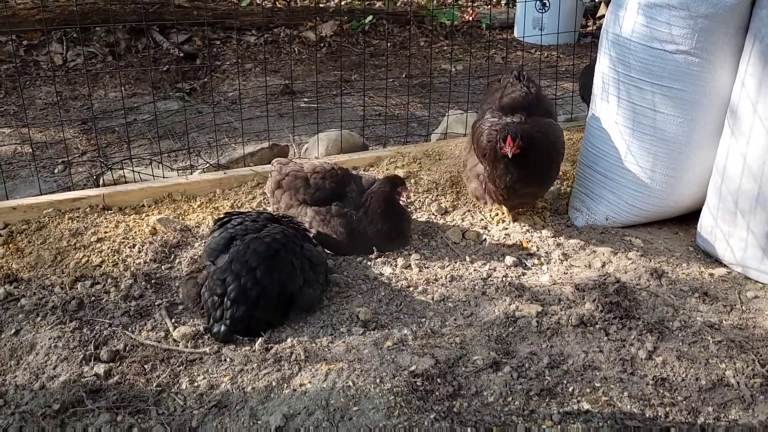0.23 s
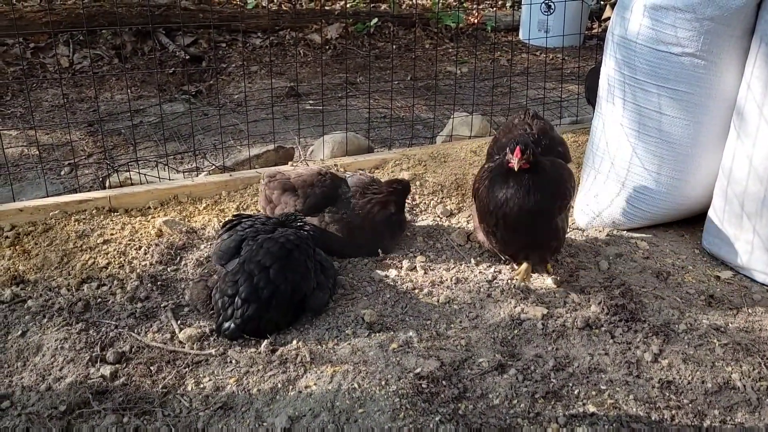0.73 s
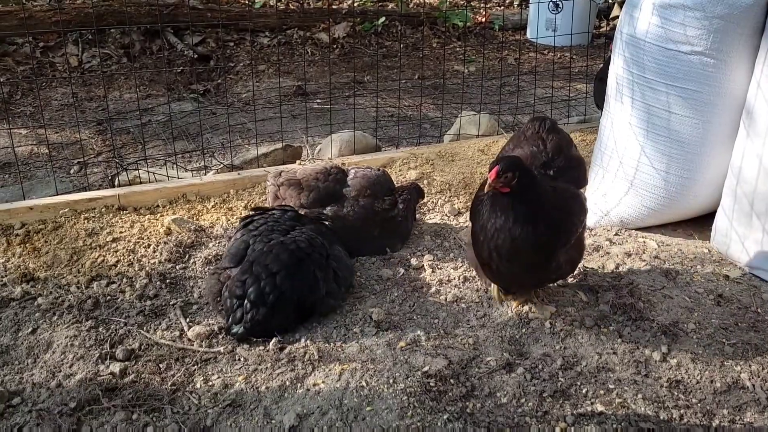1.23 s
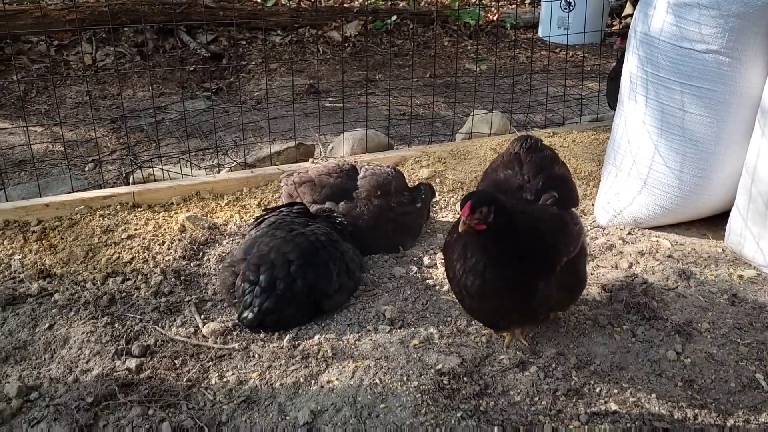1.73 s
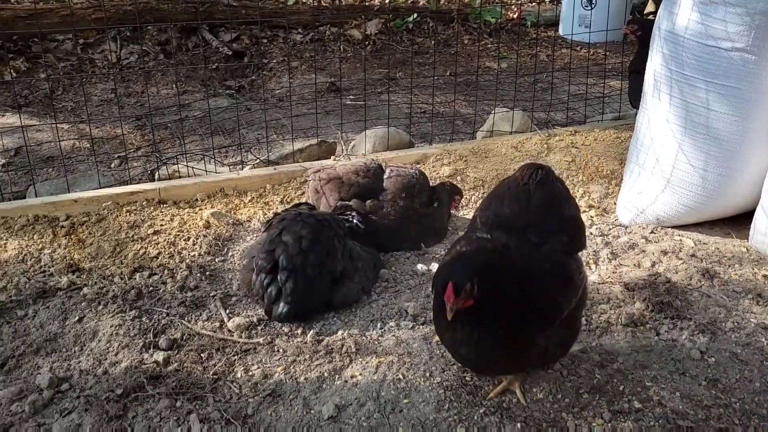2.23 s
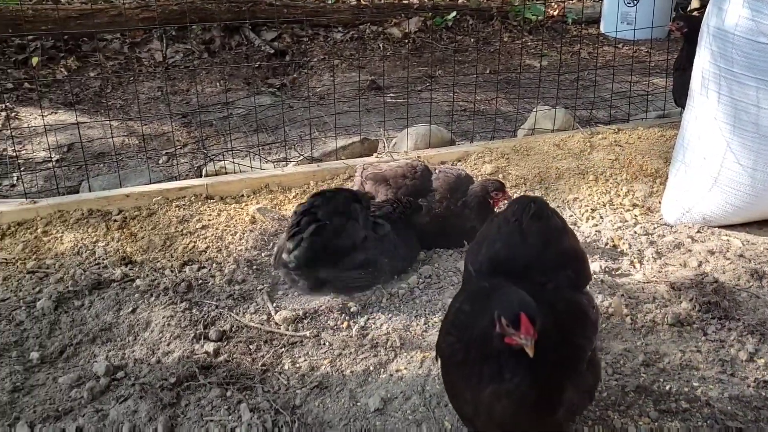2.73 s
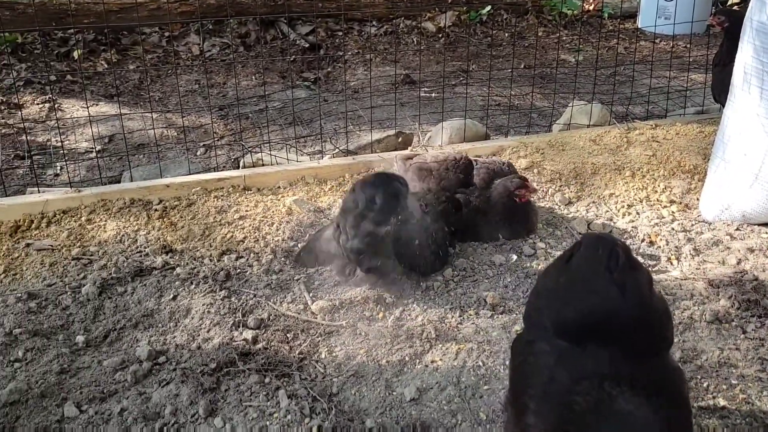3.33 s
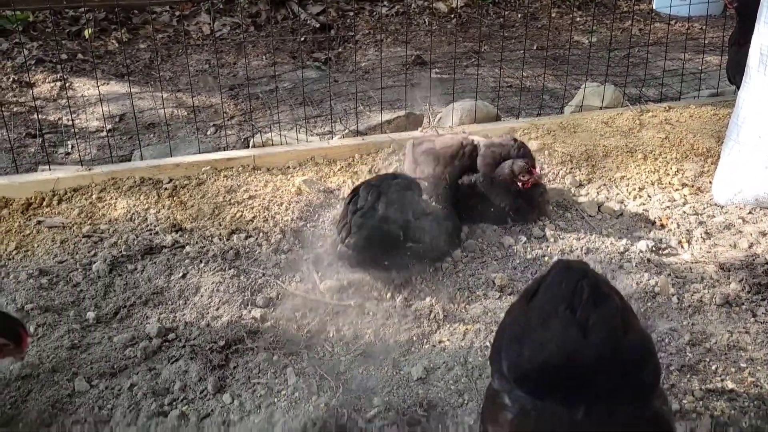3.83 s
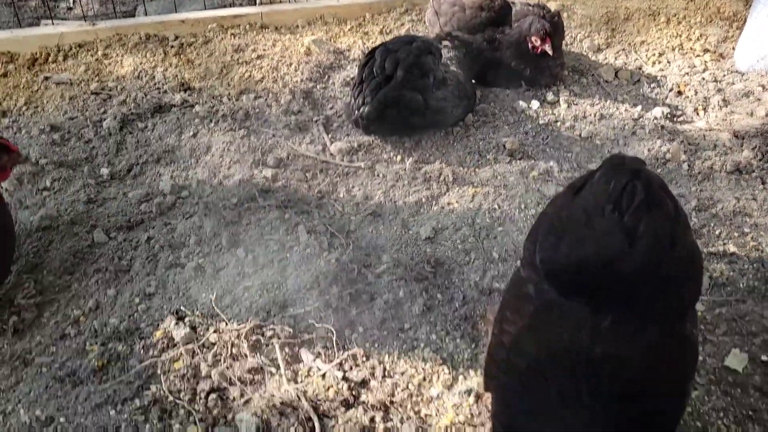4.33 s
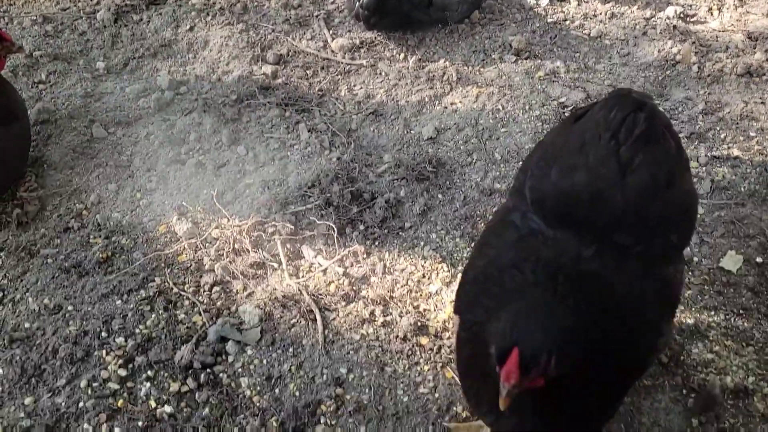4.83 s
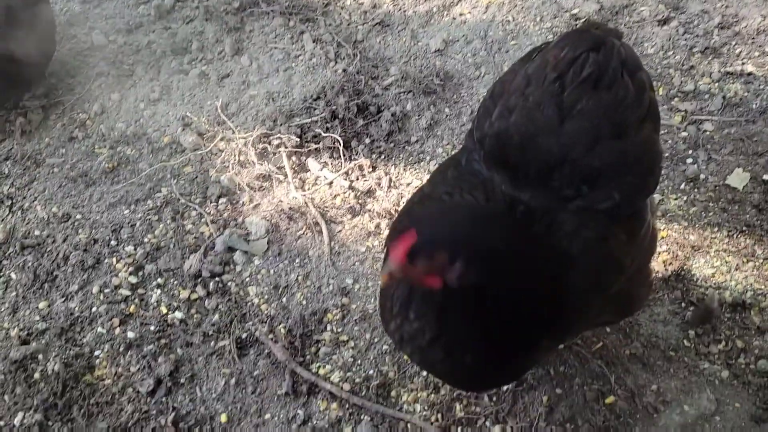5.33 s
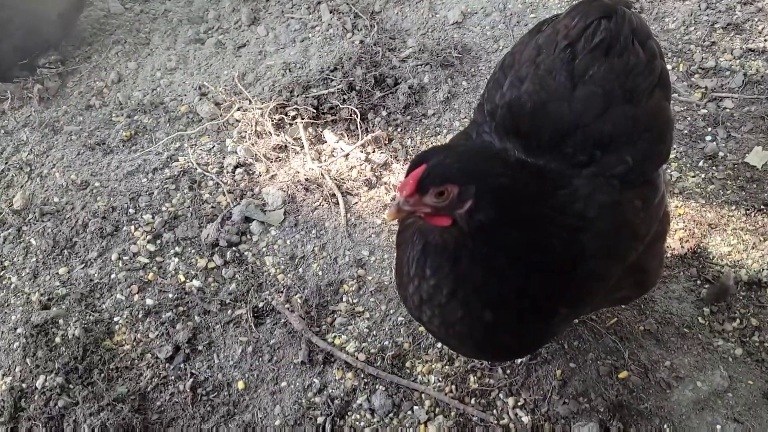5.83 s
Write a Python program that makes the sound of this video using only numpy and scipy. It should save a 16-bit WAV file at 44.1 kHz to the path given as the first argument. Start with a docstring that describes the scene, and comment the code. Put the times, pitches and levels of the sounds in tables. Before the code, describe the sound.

Hens give short, scattered clucks in a dirt run while one shakes gritty dust through its feathers, over faint crickets and soft hiss.

```python
"""A dirt run with hens: one clucks to the right, then one close by; another shakes dust through its feathers.
Each cluck is a train of syrinx pulses filtered by windpipe and beak, above a sinusoidal chest tone.
Ticks of beaks, feet and wings, wing thumps, grit and shuffling are noise shaped in time and in frequency.
Crickets chirp and insects sing in two bands, as noise in narrow resonances, over a low rumble and far hiss.
"""
import sys
import numpy as np
from scipy import signal
from scipy.fft import rfft, irfft, next_fast_len
from scipy.io import wavfile
from scipy.ndimage import uniform_filter1d

SR = 44100
rng = np.random.default_rng(int(sys.argv[2]) if len(sys.argv) > 2 else 0)


def dump(signal):
    """Clip the signal to [-1, 1] and save it as 16-bit WAV at the path in sys.argv[1]."""
    limited = np.clip(np.atleast_2d(signal).T, -1, 1)
    pcm = np.round(limited * 32767).astype(np.int16)
    wavfile.write(sys.argv[1], SR, pcm)


N = 268128   # length in samples

# Notes of the hens. Each row: start, attack, hold and fall in seconds, first held, last held and end pitch in Hz,
# chest, windpipe and beak level in dB, onset relative to these in dB, swell over the hold in dB, voice, hen.
CLUCKS = [ (0.14, 0.0079, 0.0033, 0.023, 464, 389, 346, -52.5, -55, -74, 3, 4.5, "clear", "far, murmur"),
          (0.196, 0.008, 0.019, .044, 572, 519.2, 291.4, -44, -50, -41, -9, 3, "rough", "far, turned"),
          (0.425, .013, 0.058, 0.027, 633.7, 593, 285.4, -45.5, -50.5, -43, -8.5, 1, "rough", "far, turned"),
          (1.248, 0.0075, 0.0088, 0.013, 375, 352, 378, -48.5, -54, -67.5, -11, 1, "clear", "far, murmur"),
          (1.400, 0.0046, .020, 0.017, 408, 501, 400, -56.5, -59.5, -67, 3, 3.5, "rough", "far, murmur"),
          (1.698, 0.013, 0.03, 0.038, 560.3, 543.4, 296, -42, -40.5, -39.5, -14, 2.5, "hoarse", "far"),
          (1.947, 0.012, 0.021, 0.038, 550.2, 531, 325, -40, -37.5, -36.5, -12.5, -1, "hoarse", "far"),
          (2.193, .005, .056, .034, 594, 562.7, 270.7, -45, -41, -41, -3, 4, "hoarse", "far"),
          (2.478, 0.0094, .046, 0.031, 637.6, 640, 254, -40, -35, -42, -1.5, 1, "hoarse", "far"),
          (5.254, 0.0047, 0.013, 0.016, 378.7, 338, 296, -53, -61, -54.5, -2, -3.5, "husky", "low"),
          (5.271, .009, .018, 0.0067, 304.4, 286, 281, -37, -52, -54.5, -13, -3, "husky", "low"),
          (5.555, 0.0072, 0.0017, 0.01, 436, 396.6, 308, -38.5, -35, -39, -14.5, -1, "husky", "near"),
          (5.718, 0.018, .004, 0.044, 451, 472, 290, -45, -56, -57.5, -6.5, -1, "rough", "near"),
          (5.783, 0.009, .020, .040, 541.7, 495.6, 283, -31.5, -33.5, -31, -8.5, -2, "husky", "near"),
          (5.877, 0.0093, 0.0016, .025, 405.3, 370, 261, -42.5, -45.5, -50, -10, -1.5, "husky", "near"),
          (6.053, 0.0025, 0.0014, 0.0082, 667, 626, 584, -31, -40, -36.5, -7, -10, "clear", "near"),
          (6.059, .014, 0.025, 0.027, 563, 526, 298, -31.5, -32, -25.5, -7, 5.5, "clear", "near"), ]
# Irregularity of the syrinx pulses for each voice, 0 to 1.
ROUGHNESS = {"clear": .1, "husky": .25, "rough": .4, "hoarse": .56}
# Resonances of each throat. First row: windpipe centre as a multiple of the first held pitch, width in Hz.
# Each later row, the beak: centre in Hz, width in Hz, relative level in dB.
FAR_THROAT = [(1.66, 1450), (1583, 375, 0.84), (1674, 246, 0), (2240, 83, -19), (2590, 400, -13.5),
              (3390, 700, -23), (4806, 556, -20), (9300, 560, -44), (11900, 640, -40)]
TURNED_THROAT = [(1.31, 570), (1504, 160, 0.41), (1750, 250, 0), (2200, 240, -14), (2990, 340, -10.5),
                 (3650, 240, -18.5), (4700, 1340, -19.5), (9700, 810, -40), (12000, 740, -38)]   # the far hen with her head turned
MURMUR_THROAT = [(1.82, 280), (1555, 150, 0), (1690, 320, 0)]   # the far hen with her beak almost shut
LOW_THROAT = [(1.65, 150), (1390, 160, -7), (2240, 320, 0), (2800, 440, -3.8), (4070, 620, -7)]
NEAR_THROAT = [(1.24, 480), (1540, 385, 0), (1752, 363, -0.5), (2400, 160, -25), (2946, 530, -10.5),
               (3190, 1300, -21), (4630, 1380, -23.5), (8900, 3800, -44), (13100, 500, -44)]
# Paths from each hen to the two microphone ports.
# Each row: frequency in Hz, left minus right in dB, phase lag of left in radians.
FAR_PORTS = [(200, 0, 0), (380, -1, .4), (520, -11, .3), (700, -11, .2), (1000, -5, .4), (1350, -10, .3),
             (1700, -8, -.2), (2250, 2, .5), (2800, 2, 1.1), (3600, -1, 2.0), (4400, -7, 1.9),
             (5500, -9, 1.8), (13000, 1, 3.0)]
LOW_PORTS = [(200, -3, .4), (363, -14, 0.34), (650, -2, 1.7), (1310, -1, 2.9), (1620, 2.5, 6.8),
             (2270, 6, 7.3), (2720, -5, 8), (3600, -1.5, 10.7)]
NEAR_PORTS = [(200, 0, 0), (380, -1, .3), (550, -7, .6), (1000, -8, -1.6), (1350, 0, -1.3), (1700, 2, -1.0),
              (2250, 2, .2), (2800, 4, -.5), (3600, 2, -.6), (5500, -8, -1.2), (10000, 0, 0)]
# Ticks of beaks, feet and wings. Each row: start in seconds, peak in dB, centre in Hz, left minus right in dB.
TICKS = [(0.087, -61, 810, -11), (0.344, -59.5, 750, -15), (1.217, -67.5, 734, -18), (1.387, -68, 895, -10),
         (1.849, -58, 1310, -6), (2.104, -53, 1430, -8), (2.387, -49.5, 740, -13), (2.758, -51, 920, 6),
         (2.866, -57, 940, -12), (3.041, -55.5, 800, -15), (3.217, -59, 815, -19), (3.383, -52.5, 1010, 0),
         (3.601, -47.5, 940, -6), (4.097, -60.5, 1435, 3), (4.675, -66, 1020, -19),
         (4.794, -60.5, 2920, 12), (4.853, -55.5, 3120, 11), (5.057, -58.5, 2750, 17),
         (5.106, -64.5, 860, -11), (5.504, -65, 3380, -4), (5.661, -61, 800, -11), (5.687, -62, 2010, 0),
         (5.928, -54.5, 1514, 2)]
# Fence and sacks as reflectors. Each row: lag at the left in seconds, left level in dB, right level in dB.
ECHOES = [(.006, -14, -13), (.013, -43, -7.5), (.024, -21.5, -27.5), (.041, -41.5, -26.5)]
# Wing beats against the ground. Each row: start in seconds, peak in dB.
THUMPS = [(2.801, -57.5), (2.863, -47), (3.012, -56), (3.043, -44.5), (3.159, -61), (3.214, -45.5),
          (3.374, -58), (3.419, -68), (3.598, -69)]
# Throws of grit through the feathers. Each row: middle in seconds, rms level in dB, half length in seconds.
THROWS = [(2.75, -66, 0.023), (2.867, -68, 0.023), (2.948, -53, 0.01), (3.137, -49, 0.011),
          (3.311, -49, 0.019), (3.496, -45.5, 0.017), (3.603, -51, 0.0063), (3.695, -48.5, 0.025),
          (3.742, -56, 0.02), (3.886, -67.5, 0.012)]
# Grit trickling between throws. Each row: time in seconds, level in dB.
SETTLING = [(2.5, -72), (3.126, -62.5), (3.492, -58), (3.604, -57), (3.73, -66), (3.876, -77), (4.05, -84)]
# Hens shuffling in dry dirt. Each row: middle in seconds, rms level in dB, half length in seconds.
SHUFFLES = [(.3, -81, 0.24), (1.5, -71.5, 0.039), (2.1, -79.5, .3), (3.15, -70, 0.86), (4.16, -61.5, 0.053),
            (4.8, -70.5, 0.21), (5.72, -68, 0.25)]
# Spectra of grit, shuffling, and rumble with far hiss. Each row: frequency in Hz, relative density in dB per Hz.
GRIT_SPECTRUM = [(300, 4), (450, -9.5), (800, -3.5), (1150, 0.5), (2200, -19), (2900, -7), (4600, -6),
                 (6300, -3.5), (7300, -31.5), (9000, 2.5), (11500, -17.5), (13500, -5), (15700, -9)]
SHUFFLE_SPECTRUM = [(290, -36), (500, -5), (712, -5), (782, -4.5), (1410, -1), (2640, -12.5), (4440, 2.5),
                    (6000, -11.5), (7800, -37.5), (13200, -120)]
AIR_SPECTRUM = [(15, -35), (25, -3.5), (59, 5), (140, -8), (369, -16), (582, -31), (1270, -32),
                (2360, -38.5), (3730, -31.5), (4380, -51), (5430, -45), (6920, -30), (9820, -62.5),
                (13200, -32.5), (15500, -58.5)]
# Correlation of the two channels of noise. Each row: frequency in Hz, left-right correlation from -1 to 1.
LIKENESS = [(60, .95), (200, .95), (350, .7), (600, -.1), (1200, -.3), (2500, -.1), (4400, .15),
            (8000, .05)]
# Chirps of the nearest crickets. Each row: start in seconds, length in seconds, rms level in dB.
CHIRPS = [(0, 0.12, -64.5), (0.273, 0.25, -64), (0.747, 0.23, -63.5), (1.19, .29, -63.5),
          (1.636, 0.37, -67), (2.158, 0.15, -65), (2.442, 0.24, -63.5), (2.93, 0.16, -68),
          (3.362, 0.17, -71), (3.758, 0.43, -67.5), (4.262, 0.193, -65), (4.72, .19, -67),
          (5.08, 0.27, -67.5), (5.513, 0.35, -68), (5.9, 0.077, -64)]
# Resonances of crickets and of both insect bands. Each row: centre in Hz, width in Hz, relative level in dB.
CRICKET_MODES = [(4288, 112, 6.5), (4298, 270, 0)]
LOW_CHORUS = [(4523, 490, 5.5), (4190, 120, 1.5)]
HIGH_CHORUS = [(6910, 500, -0.5), (6520, 1200, -3.5)]
# Level in time of a narrow low rumble band near 134 Hz. Each row: time in seconds, level in dB.
RUMBLE_BAND = [(0.0, -63.5), (0.8, -71.5), (1.81, -63), (2.71, -68.5), (2.89, -58.5), (3.61, -69),
               (4.17, -60.5), (6.08, -68)]
# Faint thin tones. Each row: start in seconds, end in seconds, centre in Hz, left level in dB.
HUMS = [(0, 1.55, 1263, -77), (5.57, 5.73, 1650, -78)]

# Level after the hold, in dB for chest, windpipe and beak: at mid-fall, end of fall, end of release.
MID_FALL_DB, FALLEN_DB, RELEASED_DB = (-3.5, -0.5, -6), (-9, -6, -20.5), (-14, -55, -40)
ONSET_SHARE = (1, 1, 2.07)   # share of the onset dB taken by chest, windpipe and beak
RELEASE_S = 0.015
EARLY_DROP, RELEASE_DROP = .56, .88   # share of the fall (log pitch) done half way; last pitch over end pitch
TIGHT_ONSET, SLACKEN_S = .1, .006   # share of pitch added at onset, and its decay time
STROKES_PER_S, STROKE_DEPTH, CHIRP_EDGE_S = 22.66, 0.27, 0.062   # wing strokes within a chirp
LOW_CHORUS_DB, HIGH_CHORUS_DB, AIR_DB = -69, -68, -57
CUTOFF_HZ = 15800


def amp(db):
    """A level in dB is twenty times the logarithm of the amplitude ratio."""
    return 10 ** (np.asarray(db) / 20)


def rms_one(x):
    """Division by the root mean square gives unit effective value."""
    return x / np.sqrt(np.mean(x ** 2) + 1e-20)


def in_time(rows, silent=None):
    """Linear interpolation reads the columns of a table at every sample."""
    s, *columns = np.transpose(rows)
    return [np.interp(np.arange(N) / SR, s, c, silent, silent) for c in columns]


def at_hz(points, hz, axis=1):
    """Interpolation of a column along a logarithmic frequency scale."""
    points = np.array(points)
    return np.interp(np.log(hz + 1), np.log(points[:, 0]), points[:, axis])


def drift(rate, size=N):
    """White noise through a double pole at the given rate in Hz wanders slowly, with spread 1."""
    r = np.exp(-2 * np.pi * rate / SR)
    settle = SR // 4
    wander = signal.lfilter([1], [1, -2 * r, r * r], rng.standard_normal(size + settle))
    return rms_one(wander[settle:])


def resonate(x, hz, width):
    """A damped resonator: a conjugate pole pair sets centre and width, with gain 1 at the peak."""
    r = np.exp(-np.pi * width / SR)
    return signal.lfilter([(1 - r * r) / 2, 0, (r * r - 1) / 2], [1, -2 * r * np.cos(2 * np.pi * hz / SR), r * r], x)


def modes(x, table):
    """Parallel resonators of alternating sign, each applied twice so that the valleys stay dark."""
    out = 0
    for k, (hz, width, db) in enumerate(table):
        out = out + (-1) ** k * amp(db) * resonate(resonate(x, hz, width), hz, width)
    return out


def evened(x):
    """Division by the running rms over some 25 ms holds the level near 1."""
    return x / np.sqrt(uniform_filter1d(x ** 2, size=1100, mode="reflect") + 1e-12)


def banded(white, spectrum, patchy_db):
    """Noise split into bands, each with its own level, flicker and interchannel correlation; rms 1."""
    out = 0
    edges = 15900 / 2 ** np.arange(0, 9.4, .36)
    for k, (high, low) in enumerate(zip(edges, edges[1:])):
        hz = np.sqrt(low * high)
        if hz > spectrum[0][0]:
            band = signal.butter(2, [low, high], "band", fs=SR, output="sos")
            mid, side = signal.sosfilt(band, white[k % 2])
            alike = at_hz(LIKENESS, hz)
            flicker = np.repeat(drift(240, size=N // 32 + 1), 32)[:N]   # some ten swells a second
            gain = amp(at_hz(spectrum, hz) + patchy_db * flicker)
            out = out + gain * (np.sqrt(1 + alike) * mid + np.sqrt(1 - alike) * side * [[1], [-1]])
    return rms_one(out)


def bursts(rows):
    """Powers of Gaussian bursts add."""
    t = np.arange(N) / SR
    return sum(amp(db) ** 2 * np.exp(-((t - s) / half) ** 2) for s, db, half in rows)


def gesture(t, row):
    """Fold tension sets pitch and the beak sets brightness: attack, hold, fall while it closes, release."""
    start, attack, hold, fall, hz, held_hz, end_hz, *levels_db, onset_db, swell_db = row
    stages = start + np.cumsum([0, attack, hold, fall / 2, fall / 2, RELEASE_S])
    half_hz = held_hz * (end_hz / held_hz) ** EARLY_DROP
    pitch = np.interp(t, stages, [hz, hz, held_hz, half_hz, end_hz, end_hz * RELEASE_DROP])
    # the folds start tight and slacken at once
    pitch = pitch * (1 + TIGHT_ONSET * np.exp(-np.abs(t - start) / SLACKEN_S))
    after = swell_db + np.array([np.zeros(3), MID_FALL_DB, FALLEN_DB, RELEASED_DB])
    shape = np.vstack([onset_db * np.array(ONSET_SHARE), np.zeros(3), after]) + levels_db
    return pitch, *(np.interp(t, stages, column) for column in shape.T)


def cluck(row, rough, throat):
    """Source and filter: syrinx pulses, uneven when rough, excite windpipe and beak above a chest tone."""
    start, end = row[0], sum(row[:4]) + RELEASE_S
    t = (round(start * SR) + np.arange(-600, 7000)) / SR
    size = len(t)
    hz, chest_db, pipe_db, beak_db = gesture(t, row)
    rough = np.minimum(rough * np.sqrt(hz.max() / hz), 1)   # slack folds at the end of a call flap unevenly
    jitter = .07 * drift(60, size=size) + 0.097 * drift(300, size=size)
    cycles = np.cumsum(hz * (1 + rough * jitter)) / SR
    number = cycles.astype(int)
    strong_weak = .5 * (-1) ** number   # every second pulse weaker: half-pitch lines
    uneven = strong_weak + .65 * rng.standard_normal(number[-1] + 1)[number]
    pulses = np.diff(number, prepend=0) * (1 + rough * uneven)
    folds_open = cycles % 1 < .4
    breath = 0.23 * rough * rng.standard_normal(size) * folds_open   # air rushes while the folds are open
    source = pulses + breath
    chest = np.sqrt(2) * np.sin(2 * np.pi * cycles) * amp(4.5 * rough * drift(80, size=size))
    # a stretched neck raises pitch and windpipe alike
    pipe_ratio, pipe_width = throat[0]
    pipe = modes(source, [(pipe_ratio * row[4], pipe_width, 0)])
    pipe = signal.sosfilt(signal.butter(4, 1500, fs=SR, output="sos"), pipe)
    beak = modes(source, throat[1:])
    above = amp(pipe_db) * evened(pipe) + amp(beak_db) * evened(beak)
    edge = np.clip(np.minimum((t - start) / 0.003, (end + 0.0041 - t) / 0.0079), 0, 1)
    return round(t[0] * SR), edge * (amp(chest_db) * chest + above)


def hen(name, throat, ports):
    """Superposed notes of one hen, with the level and phase differences of her paths to two ports."""
    voice = np.zeros(next_fast_len(N + SR // 4))
    for *row, kind, who in CLUCKS:
        if who == name:
            start, sound = cluck(row, ROUGHNESS[kind], throat)
            voice[start:start + len(sound)] += sound
    voice = voice - 0.99 * resonate(voice, 484, 120)   # the bounce off the ground cancels a narrow band
    hz = np.fft.rfftfreq(len(voice), 1 / SR)
    left_over_right = amp(at_hz(ports, hz)) * np.exp(-1j * at_hz(ports, hz, axis=2))
    # scaled so that the mean of the ports keeps the voice's level, short of deep cancellation
    right = 2 / np.maximum(np.abs(1 + left_over_right), .8) * rfft(voice)
    return irfft([left_over_right * right, right], len(voice))[:, :N]


def all_hens():
    """One resonator set per throat posture; the far hen holds her head otherwise in the early calls."""
    hens = hen("far, turned", TURNED_THROAT, FAR_PORTS)
    hens += hen("far", FAR_THROAT, FAR_PORTS)
    hens += hen("low", LOW_THROAT, LOW_PORTS)
    hens += hen("near", NEAR_THROAT, NEAR_PORTS)
    hens += hen("far, murmur", MURMUR_THROAT, FAR_PORTS)
    return hens


def ticks():
    """Impact of beak, foot or wing: a decaying puff of noise takes its colour from one broad resonance."""
    size = 1500
    out = np.zeros((2, N + size))
    fall = np.exp(-np.arange(size) / SR / .0035)
    for (s, db, hz, pan_db), noise in zip(TICKS, rng.standard_normal((len(TICKS), size))):
        puff = modes(noise * fall, [(hz, .7 * hz, 0)])
        start = round(s * SR)
        gain = amp([[db + pan_db / 2], [db - pan_db / 2]])
        out[:, start:start + size] += puff / np.abs(puff).max() * gain
    return out[:, :N]


def yard(x):
    """Reflection: delayed, lowpassed copies cross to the other side, with longer lags at the right."""
    crossed = x[::-1]
    dull = signal.lfilter([.4], [1, -.6], crossed)
    out = np.zeros((2, N))
    for lag, *side_db in ECHOES:
        for k in range(2):
            n = round(lag * (1 + 0.187 * k) * SR)
            out[k, n:] += amp(side_db[k]) * dull[k, :-n]
    return out


def thumps():
    """Displaced air: a decaying noise push through two low, broad resonances."""
    size = 2000
    out, t = np.zeros(N), np.arange(size) / SR
    for (s, db), noise in zip(THUMPS, rng.standard_normal((len(THUMPS), size))):
        push = resonate(resonate(noise * np.exp(-t / .011), 260, 300), 200, 350)
        start = round(s * SR)
        out[start:start + size] += push / np.abs(push).max() * amp(db)
    return out


def dust_bath():
    """Many small impacts: dense grains of grit of random size, thrown in bursts and trickling between."""
    power = bursts(THROWS) + amp(in_time(SETTLING, -120)[0]) ** 2
    grains = rng.standard_normal((2, 2, N)) * amp(2.15 * rng.exponential(1, N))
    balance = amp([[-1.2], [1.2]])   # slightly to the right
    return np.sqrt(power) * balance * banded(grains, GRIT_SPECTRUM, patchy_db=3.5)


def shuffling(white):
    """Friction on dry dirt: band-shaped noise under Gaussian bursts of power."""
    return np.sqrt(bursts(SHUFFLES)) * banded(white, SHUFFLE_SPECTRUM, patchy_db=2.5)


def crickets():
    """Amplitude modulation: a narrow rasp, switched on for each chirp and pulsed by the wing strokes."""
    t, gain = np.arange(N) / SR, 0
    for start, length, db in CHIRPS:
        on = np.clip(np.minimum(t - start, start + length - t) / CHIRP_EDGE_S + .5, 0, 1)
        strokes = 1 - STROKE_DEPTH * np.cos(2 * np.pi * STROKES_PER_S * (t - start + 0.013))
        gain = gain + amp(db) * on * strokes
    return gain * rms_one(modes(rng.standard_normal((2, N)), CRICKET_MODES))


def chorus(table, level_db, throb_db):
    """Many sources merge into narrow-band noise, each group swelling slowly, all gently throbbing."""
    white = rng.standard_normal((2, N))
    groups = sum(amp(1.8 * drift(2.5)) * modes(white, [group]) for group in table)
    return amp(level_db + throb_db * drift(30.0)) * rms_one(groups)


def air(white):
    """Broadband background: flickering noise bands form rumble and far hiss, slightly to the right."""
    return amp(AIR_DB + np.array([[-.5], [.5]])) * banded(white, AIR_SPECTRUM, patchy_db=3.0)


def low_rumble(white):
    """Narrow-band noise wavers by itself: a band near 134 Hz with a level in time, a deeper one at a set level."""
    upper = amp(in_time(RUMBLE_BAND)[0]) * rms_one(modes(white[0, 0], [(134.1, 20.0, 0)]))
    deeper = amp(-69.0) * rms_one(modes(white[1, 0], [(58.2, 14, 0)]))
    return upper + deeper


def hums():
    """Narrow resonances of noise waver as tones, in opposite phase at the two ports."""
    t, out = np.arange(N) / SR, 0
    for start, end, hz, db in HUMS:
        on = np.clip(np.minimum(t - start, end - t) / 0.033, 0, 1)
        out = out + amp(db) * on * rms_one(modes(rng.standard_normal(N), [(hz, 40, 0)]))
    return out * [[1], [-.6]]


def scene():
    """Superposition of hens, ticks, thumps, dirt sounds and the background."""
    near = all_hens() + ticks()
    ground = yard(near) + thumps() + dust_bath()
    insects = chorus(LOW_CHORUS, LOW_CHORUS_DB, throb_db=1.2)
    insects = insects + chorus(HIGH_CHORUS, HIGH_CHORUS_DB, throb_db=.8)
    white = rng.standard_normal((2, 2, N))
    backwards = white[..., ::-1]   # reversed noise sounds independent of the forward noise
    background = air(white) + low_rumble(white) + hums()
    return near + ground + shuffling(backwards) + crickets() + insects + background


def record(dry):
    """Band limitation: the microphone loses the deepest bass, and the top is cut steeply."""
    dry = signal.sosfilt(signal.butter(4, 42, "high", fs=SR, output="sos"), dry)
    return signal.sosfilt(signal.cheby2(20, 70, CUTOFF_HZ, fs=SR, output="sos"), dry)


dry = scene()
out = record(dry)
dump(out)
```